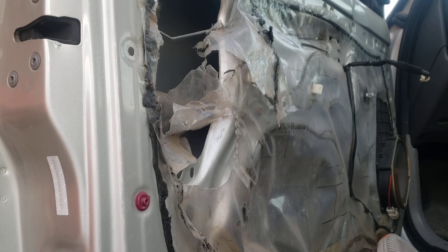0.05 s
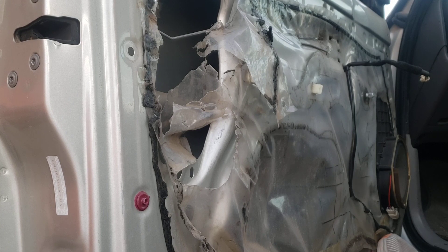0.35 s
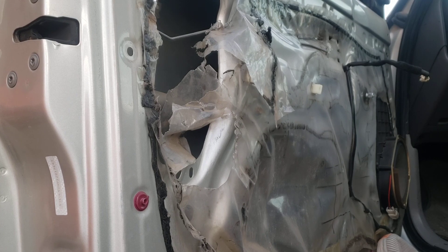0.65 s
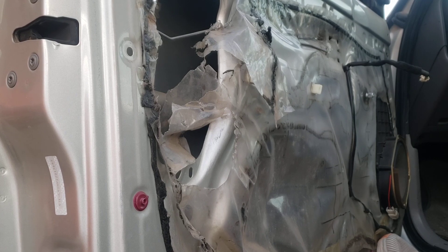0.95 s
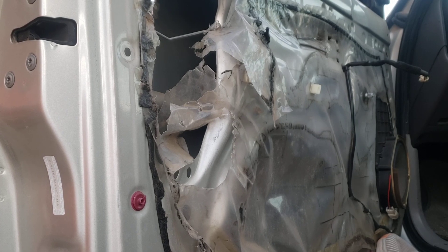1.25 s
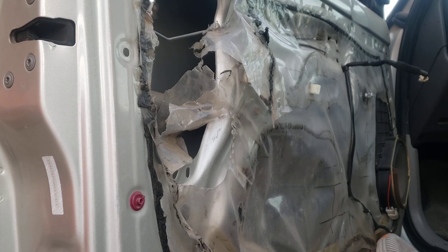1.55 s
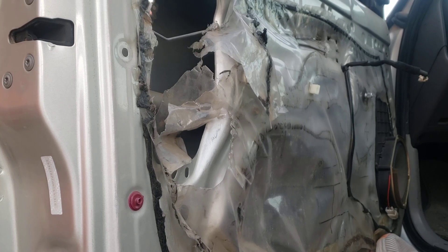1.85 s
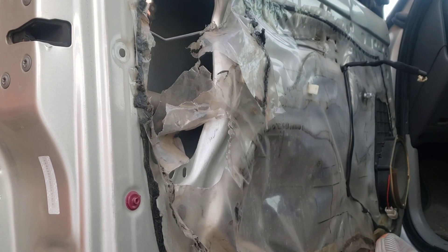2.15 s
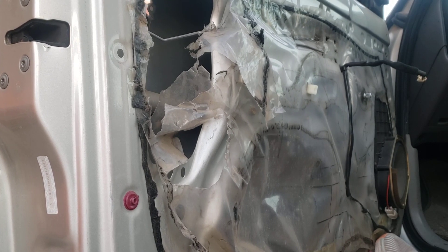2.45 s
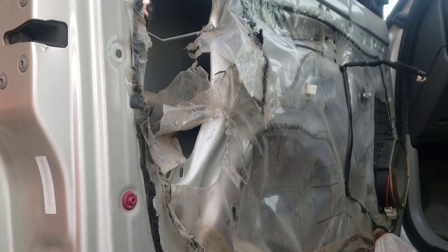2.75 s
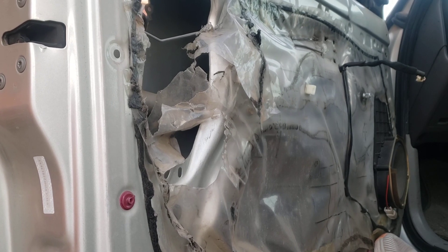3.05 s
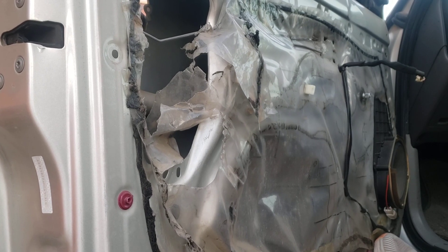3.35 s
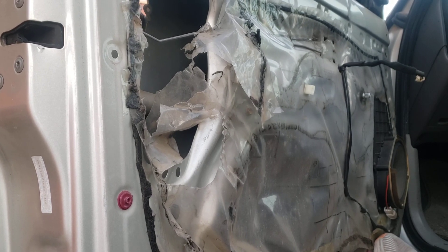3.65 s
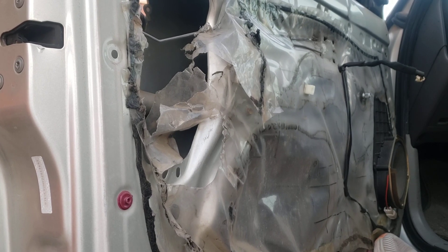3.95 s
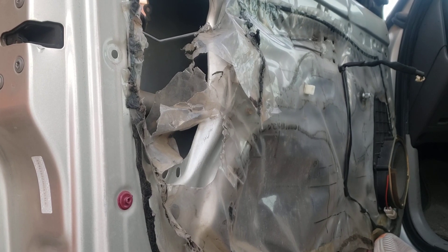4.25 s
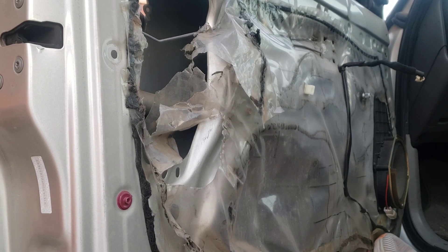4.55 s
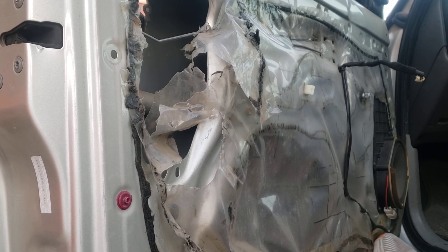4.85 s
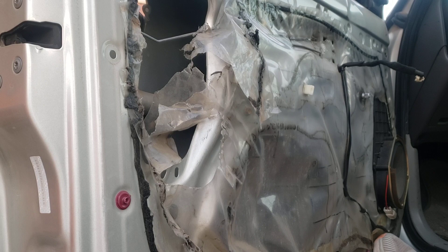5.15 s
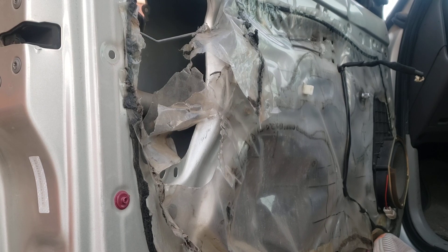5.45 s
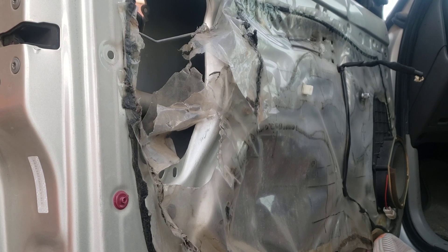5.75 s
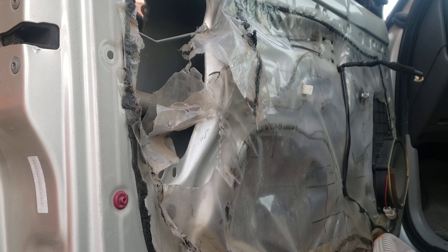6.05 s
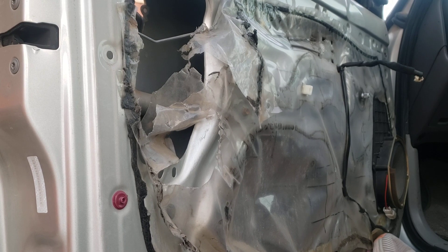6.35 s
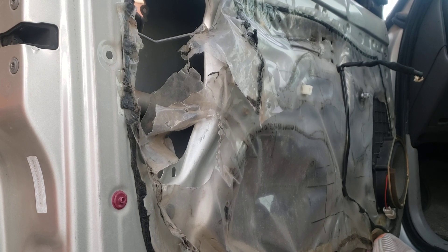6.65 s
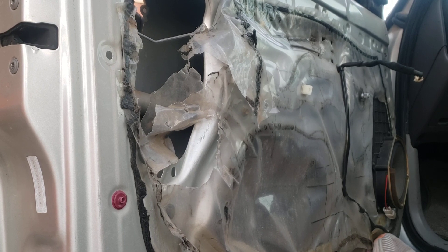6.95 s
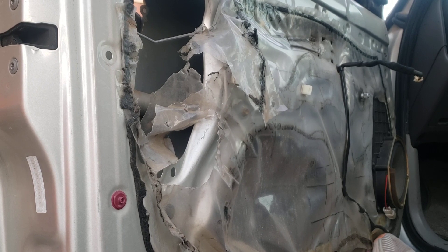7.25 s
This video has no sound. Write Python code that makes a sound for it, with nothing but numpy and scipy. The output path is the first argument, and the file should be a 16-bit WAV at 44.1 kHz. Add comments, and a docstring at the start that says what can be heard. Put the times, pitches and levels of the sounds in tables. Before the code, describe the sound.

Close to the microphone and mostly on the left, plastic sheeting in a hollow car door rustles in short, light bursts. Now and then a patch pops through with a crack and a dull knock, most strongly before the middle. In the second half the handling gets firmer, and the creases crackle and tick densely until the end. Quiet garage room tone and a low drone lie underneath.

```python
"""Plastic sheet in a car door

A stiff vapour barrier is pushed about inside a stripped car door, close to a phone in a garage.
Creases give way in showers of tiny cracks, wide folds flex and flutter, and now and then a patch snaps
through and rings the door cavity. The sheet is louder on the left microphone, as the phone's body
shades the right one. Room noise and a low rumble lie under it all."""
import sys
import numpy as np
from scipy import signal
from scipy.fft import rfft, irfft
from scipy.io import wavfile
from scipy.ndimage import uniform_filter1d

SR = 44100
rng = np.random.default_rng(int(sys.argv[2]) if len(sys.argv) > 2 else 0)


def to_wav(s):
    """Save 16-bit WAV."""
    ch = np.atleast_2d(s).T  # columns
    pcm = np.round(np.clip(ch, -1, 1) * 32767)  # PCM
    wavfile.write(sys.argv[1], SR, pcm.astype(np.int16))


N = 321489
T = np.arange(N) / SR

# spectrum of the garage's room tone: f/Hz, level/dB
ROOM_TONE = [(20, -25.5), (38, -7.5), (58, -1.5), (100, 2), (150, -5), (230, -8), (330, -17), (550, -23.5),
             (880, -20), (1400, -30), (2100, -37.5), (6000, -95), (10000, -56), (16000, -42)]
# course of the deep rumble: t/s, level/dB
RUMBLE_LEVEL = [(0, -45), (.9, -45), (2, -57.5), (3.3, -55), (7.3, -60)]
# course of the low drone: t/s, level/dB
DRONE_LEVEL = [(0, -63), (2.4, -75), (3.2, -48.5), (3.7, -48.5), (5.9, -45.5), (7.3, -54.5)]
# modes of the hollow door behind the sheet: f/Hz, t60/s, level/dB
DOOR_MODES = [(266, 0.043, -5.5), (439, 0.012, 7.5), (470.5, 0.053, 3.5), (523, 0.038, -5), (729, 0.025, 3),
              (894, 0.018, 2.5), (967, 0.03, -2), (1433, 0.014, -7.5), (1520, 0.034, -16),
              (2980, 0.092, -20.5), (3710, 0.036, -21)]
# the hand resting on the sheet, heavier towards the end: t/s, crinkle level/dB
HAND_CONTACT = [(0, -76.5), (1.85, -80), (2.05, -69), (2.7, -71.5), (2.95, -66), (3.5, -66), (4.0, -67.5),
                (5.1, -65), (5.95, -56.5), (6.5, -52), (7.3, -50)]
# pushes of the hand: t/s, swell/s, hold/s, crinkle level/dB, long creases against it/dB, fold level/dB
HAND_PUSHES = [ (0.026, 0.012, 0.0043, -52.5, -18, -40), (0.172, 0.062, .004, -52, -11.5, -44),
               (0.457, 0.03, .005, -68, 0, -45), (0.636, 0.02, 0.16, -68, -31, -70),
               (0.837, 0.0079, 0.098, -60, -32, -54), (1.056, 0.046, 0.035, -52, -9, -44.5),
               (1.126, 0.015, 0.0068, -48, -11, -45), (1.324, 0.019, 0.1, -59, -11, -50.5),
               (1.467, 0.015, 0.0083, -49, -17, -48), (1.908, 0.018, 0.0056, -53.5, -4, -40.5),
               (2.015, 0.029, 0.034, -60, 2, -51.5), (2.743, 0.053, 0.06, -54, -7, -43),
               (2.852, 0.037, 0.073, -61.5, -22, -53), (3.006, 0.083, 0.028, -50.5, -9.5, -42),
               (3.189, 0.039, 0.025, -41.5, -14.5, -46.5), (3.25, 0.12, 0.0064, -46.5, 4, -34),
               (3.618, 0.045, 0.0048, -48, -2.5, -44), (3.789, 0.0069, 0.0046, -57.5, 10, -43.5),
               (3.862, 0.018, 0.016, -55.5, -24, -52), (3.997, 0.022, 0.0086, -39, -15, -45),
               (4.18, 0.082, 0.026, -52, -19, -60), (4.312, 0.012, 0.011, -51.5, -1, -42.5),
               (4.357, 0.054, 0.17, -54, -7, -51), (4.618, 0.034, 0.011, -45.5, -5.5, -51),
               (4.71, 0.0083, 0.0041, -48.5, -11, -68), (4.778, 0.05, 0.029, -50.5, -19, -69),
               (4.865, 0.045, 0.024, -52, -12, -48), (4.968, 0.0094, 0.0088, -48.5, 5, -38.5),
               (5.071, 0.031, 0.0062, -51, -1, -44.5), (5.164, 0.062, 0.016, -49.5, 1, -43.5),
               (5.27, 0.029, 0.1, -45, 1, -37.5), (5.343, 0.11, 0.053, -41, -5, -35.5),
               (5.508, 0.022, 0.051, -52, -4, -52), (5.598, 0.014, 0.15, -39.5, -3, -39),
               (5.755, 0.052, 0.031, -46, -3, -41.5), (5.968, 0.097, 0.042, -41.5, -3, -39.5),
               (6.199, 0.034, 0.041, -39, -2.5, -36.5), (6.251, 0.044, 0.072, -30.5, -4.5, -32.5),
               (6.376, 0.013, 0.055, -50.5, 3, -43), (6.559, 0.0055, 0.14, -41.5, -2, -41.5),
               (6.744, 0.016, 0.085, -42.5, -2, -45), (6.866, 0.011, 0.046, -43.5, 1, -52),
               (6.942, 0.041, 0.031, -36, -3, -34), (7.02, 0.052, 0.073, -46, -2.5, -44),
               (7.163, 0.07, 0.12, -44.5, -2, -64), ]
# the loudest single creases: t/s, level/dB
CREASE_TICKS = [(.8176, -60), (1.0319, -22), (1.205, -43.5), (1.407, -43), (1.6916, -58), (1.7288, -55),
                (2.2449, -32.5), (2.799, -40), (3.4727, -35), (4.0045, -51), (4.235, -37), (4.5007, -37.5),
                (4.631, -41), (4.981, -36), (5.0585, -35), (5.1387, -41), (5.1728, -25), (5.2424, -35),
                (5.2805, -28.5), (5.3707, -29.5), (5.403, -22), (5.5191, -30), (5.539, -36.5),
                (5.553, -30.5), (5.6103, -36), (5.7228, -23.5), (5.758, -38), (5.7844, -30),
                (5.8267, -23.5), (5.8333, -26), (5.8697, -25.5), (5.876, -28.5), (5.9242, -35),
                (5.9618, -34), (6.013, -26), (6.0648, -21.5), (6.0967, -27.5), (6.103, -29), (6.1154, -35),
                (6.1455, -37), (6.1945, -19.5), (6.2088, -17.5), (6.2439, -19), (6.2834, -22), (6.374, -25),
                (6.4123, -26), (6.4408, -29.5), (6.4492, -32), (6.4728, -27), (6.5573, -22), (6.594, -24),
                (6.623, -27), (6.7017, -29.5), (6.723, -29.5), (6.7735, -32), (6.816, -23), (6.849, -28),
                (6.8753, -26), (6.9225, -28), (6.9956, -23.5), (7.0871, -23.5), (7.1162, -37),
                (7.1696, -22), (7.221, -27)]
# patches snapping through, some together: t/s, crack/dB, patch f/Hz, patch/dB, swing time/s, knock/dB
PATCH_SNAPS = [ (0.0414, -41, 507, -34, 0.00077, -34), (0.4587, -33, 940, -33, 0.0019, -37.5),
               (0.5765, -24, 905, -8.5, 0.0017, -19), (.5765, -52, 3500, -36, 0.0024, -54),
               (.581, -50, 2980, -43.5, 0.0065, -46), (1.0309, -32, 600, -50, 0.00088, -29),
               (1.602, -69, 850, -41, 0.0019, -55), (2.2473, -52, 4400, -54, 0.0011, -58),
               (2.586, -11, 213, -6.5, 0.0019, -15.5), (2.586, -16.5, 392, -23, 0.0048, -46),
               (2.633, -16, 958, -31, 0.0033, -34), (2.967, -62, 895, -29, 0.00062, -44),
               (3.316, -48, 870, -22.5, 0.0014, -33), (3.3393, -27, 920, -16, 0.0012, -23.5),
               (3.349, -16, 258, -22.5, 0.0023, -25.5), (3.3615, -9.5, 540, -21, 0.0022, -15.5),
               (3.3645, -43, 256, -17, 0.0035, -28), (3.3649, -38, 2150, -16.5, 0.0005, -52),
               (3.659, -42, 3500, -46, 0.0055, -40), (3.8057, -25, 471, -17.5, 0.0019, -50),
               (3.806, -26.5, 1193, -30.5, 0.0033, -36.5), (4.025, -23, 254, -25, 0.0025, -32),
               (4.32, -49, 835, -26.5, 0.00043, -49), (4.495, -43, 730, -28, 0.0012, -43),
               (6.171, -23, 890, -29.5, 0.00095, -32), (6.551, -25, 831, -31, 0.00087, -35),
               (7.1055, -24, 900, -32, 0.0018, -48), (7.1078, -34, 257, -30, 0.0038, -32.5), ]
# spectrum of a crack in the plastic: f/Hz, level/dB
CRACK_SPECTRUM = [(150, -0.5), (500, -0.5), (1400, -1.5), (2200, -0.5), (2700, -3.5), (3500, -2),
                  (5000, -6), (7000, -6), (10000, -2.5), (16000, -5.5)]
# spectrum of short, bright creases: f/Hz, level/dB
SHORT_SPECTRUM = [(1000, -28), (2900, -12), (3700, -3.5), (5400, -9.5), (7000, -11), (8800, 0.5),
                  (12500, 3), (16000, -1)]
# spectrum of long, duller creases: f/Hz, level/dB
LONG_SPECTRUM = [(200, -9), (600, 3), (1300, 7), (1750, -2.5), (2200, 5), (2800, 2), (3600, 0.5),
                 (4800, -6), (9000, -3.5), (16000, -60)]
# parts of the sheet: favoured crease f/Hz, lead at the right microphone/s
SHEET_PARTS = [(2200, 0.00019), (3700, 0.00024), (5500, 0.00016), (9000, 0.00023), (12800, 0.000137)]
# the phone's shade on the right microphone: f/Hz, level against the left/dB
PHONE_SHADE = [(60, -3.5), (200, -5), (400, -8), (750, -12), (1300, -18.5), (2400, -20), (4400, -23),
               (8000, -24.5), (15000, -10)]


def undb(db):
    """Decibels to gain."""
    return 10 ** (np.asarray(db) / 20)


def curve(rows):
    """A table of t/s and value, joined by straight lines."""
    return np.interp(T, *np.transpose(rows))


def unit(x):
    """Scale to rms 1."""
    return x / np.sqrt(np.mean(x ** 2))


def noise():
    """White noise."""
    return rng.standard_normal(N)


def colour(x, points, size=4096):
    """Causal filter following a table of f/Hz and level/dB, built from the cepstrum."""
    hz, db = np.transpose(points)
    bins_hz = np.fft.rfftfreq(size, 1 / SR)
    gain = undb(np.interp(np.log(bins_hz + 1), np.log(hz), db))
    cepstrum = irfft(np.log(gain))
    cepstrum[1:size // 2] *= 2
    cepstrum[size // 2 + 1:] = 0
    impulse = irfft(np.exp(rfft(cepstrum)))
    return signal.fftconvolve(x, impulse)[:N]


def resonate(x, hz, width_hz):
    """One resonance, gain 1 at its centre."""
    return signal.lfilter(*signal.iirpeak(hz, hz / width_hz, fs=SR), x)


def add(track, s, sound):
    """Mix a sound into a track at time s."""
    start = int(s * SR)
    track[start:start + len(sound)] += sound[:N - start]


def early(x, lead_s):
    """The same sound, reaching a microphone a little sooner."""
    return np.interp(T + lead_s, T, x)


def garage():
    """Steady room tone with a deep rumble and a low, wavering drone."""
    room = undb(-44) * unit(colour(noise(), ROOM_TONE))
    for level, hz, width_hz in ((RUMBLE_LEVEL, 44.3, 13), (DRONE_LEVEL, 76.3, 16)):
        band = resonate(noise(), hz, width_hz)
        room += undb(curve(level)) * unit(resonate(band, hz, width_hz))
    return room


def reflections(x, near_db, near_t60, far_db, far_t60):
    """Echoes off the door skin, then the garage tail; creases lie apart, so echoes never repeat."""
    out = np.zeros((2, N))
    edges_hz = np.geomspace(150, 17000, 13)
    hiss = rng.standard_normal((2, N))
    for lo, hi in zip(edges_hz, edges_hz[1:]):
        band = signal.butter(4, [lo, hi], "bandpass", fs=SR, output="sos")
        power = signal.sosfilt(band, x + 1e-9 * hiss[0]) ** 2
        energy = 0
        for db, t60 in ((near_db, near_t60), (far_db, far_t60)):
            keep = undb(-60 / (t60 * SR)) ** 2
            energy = energy + undb(db) ** 2 * signal.lfilter([1 - keep], [1, -keep], power)
        bounce = hi / np.hypot(hi, 1800)  # long waves bend round the panel instead of bouncing off it
        out += bounce * np.sqrt(energy) * unit(signal.sosfilt(band, hiss))
    return out


def metal_echo(x, echo_db, gap_s, hold_s=.07):
    """The metal just behind the sheet mirrors each crease; as the gap shifts, so does the colour."""
    hold = int(hold_s * SR) + 1
    lags = gap_s * SR * rng.uniform(.5, 2, N // hold + 1)
    lags = np.repeat(lags, hold)[:N].astype(int)
    echo = x[..., np.maximum(np.arange(N) - lags, 0)]
    return (x + undb(echo_db) * echo) / np.hypot(1, undb(echo_db))


def door(x):
    """The hollow door answers with a few short modes, neighbours in opposite phase."""
    t = T[:SR // 5]
    ring = sum((-1) ** k * undb(db - 60 * t / t60) * np.sin(2 * np.pi * hz * t)
               for k, (hz, t60, db) in enumerate(DOOR_MODES))
    return signal.fftconvolve(x, ring)[:N]


def hand(sag_db_per_s=28, release_db_per_s=344):
    """Gains of crinkle, long creases and wide folds: a push swells, sags while held and dies away."""
    resting_db = curve(HAND_CONTACT) + np.array([[0], [-1.5], [2.5]])  # crinkle, long creases, folds
    power = undb(resting_db) ** 2
    for s, swell_s, hold_s, db, long_db, fold_db in HAND_PUSHES:
        swell = np.clip((T - s) / swell_s, 0, 1)
        held_s = np.maximum(T - s - swell_s, 0)
        released_s = np.clip(held_s - hold_s, 0, 1)
        push = swell * undb(-sag_db_per_s * held_s - release_db_per_s * released_s)
        power += (undb([[db], [db + long_db], [fold_db]]) * push) ** 2
    return np.sqrt(power)


def shower(per_s, spread_db, decay_s, even_s):
    """Envelope of random buckles, many small and a few larger, each dying quickly; rms near 1."""
    size = undb(spread_db * np.minimum(rng.exponential(size=N), 4))
    energy = (rng.random(N) < per_s / SR) * size ** 2
    energy = signal.lfilter([1], [1, -np.exp(-2 / (decay_s * SR))], energy) + 1e-4
    # the hand feeds energy in steadily, so a large buckle relieves its neighbours
    supply = uniform_filter1d(energy, int(even_s * SR) + 1)
    return np.sqrt(energy / supply)


def crack(swell_s, size=1024):
    """A buckle runs along a crease, swells and dies away."""
    age = T[:size] / swell_s
    return rng.choice([-1, 1], size) * age * np.exp(1 - age)


def wide_folds(fold_gain):
    """Wide folds flop over and sound through the door."""
    flops = shower(per_s=260, spread_db=0.5, decay_s=0.00071, even_s=0.0313) * noise()
    tone = [(120, 8.5), (390, -7.5), (475, -3.5), (570, -4.5), (850, -0.5), (1600, 3.5), (4000, -18)]
    return undb(-4) * fold_gain * unit(colour(door(flops), tone))


def ticks():
    """Single stiff creases let go with a bright click, each ringing briefly at its own pitch."""
    track = np.zeros(N)
    pitches_hz = np.exp(rng.uniform(np.log(3800), np.log(14000), len(CREASE_TICKS)))
    for (s, db), hz in zip(CREASE_TICKS, pitches_hz):
        click = crack(swell_s=0.00046)
        ring = undb(7) * resonate(click, hz, .14 * hz)
        add(track, s, undb(db) * (click + ring))
    return colour(track, CRACK_SPECTRUM)


def snaps():
    """A patch cracks, swings a few times at its own pitch and knocks on the door."""
    cracks, swings, knocks = np.zeros((3, N))
    t = T[:SR // 20]
    for s, crack_db, hz, patch_db, swing_s, knock_db in PATCH_SNAPS:
        add(cracks, s, undb(crack_db) * crack(swell_s=0.00065))
        swell = t / swing_s * np.exp(1 - t / swing_s)
        add(swings, s, -undb(patch_db) * swell * np.sin(2 * np.pi * hz * t))
        add(knocks, s, undb([knock_db]))
    # the swings carry no deep bass below about 75 Hz
    swings = signal.sosfilt(signal.butter(2, 75, "highpass", fs=SR, output="sos"), swings)
    return undb(-2) * (colour(cracks, CRACK_SPECTRUM) + swings + door(knocks))


def crinkle(fine_gain, long_gain):
    """The sheet close up, on both microphones: gentle pushes slide, hard ones buckle the creases."""
    sliding_share = 1 / (1 + fine_gain / undb(-59.5))
    # one buckle sets off its neighbours, so they come in short, sharp volleys
    volleys = shower(per_s=210, spread_db=1.0, decay_s=0.0024, even_s=0.018)
    short = unit(colour(noise(), SHORT_SPECTRUM))
    long = unit(colour(noise(), LONG_SPECTRUM))
    coarseness = long_gain / fine_gain
    out = np.zeros((2, N))
    for hz, lead_s in SHEET_PARTS:
        shift = rng.integers(N)  # the parts rustle independently
        film = undb(-3.5) * np.roll(short, shift) + coarseness * np.roll(long, shift)
        film = undb(-3) * film + undb(6) * resonate(film, hz, 0.26 * hz)
        buckles = shower(per_s=900, spread_db=-0.5, decay_s=0.00021, even_s=0.024) * volleys
        texture = np.sqrt(sliding_share + (1 - sliding_share) * buckles ** 2)
        part = undb(-6.5) * fine_gain * film * texture
        out += [part, early(part, lead_s)]
    return metal_echo(out, echo_db=-4.5, gap_s=.0008)


def scene():
    """Two microphones close to the door, each with its own echoes; the right one is early and shaded."""
    fine_gain, long_gain, fold_gain = hand()
    creases = crinkle(fine_gain, long_gain)
    flexing = wide_folds(fold_gain) + snaps() + ticks()
    echoes = reflections(creases[0] + flexing, near_db=-3, near_t60=0.07, far_db=-14.5, far_t60=0.16)
    common = flexing + garage()
    left = creases[0] + common + echoes[0]
    right = creases[1] + early(common, lead_s=9 / SR) + undb(8.5) * echoes[1]
    return np.array([left, colour(right, PHONE_SHADE)])


def record(dry):
    """The phone cuts the top steeply above 16 kHz."""
    return signal.sosfilt(signal.ellip(10, .2, 80, 16000, fs=SR, output="sos"), dry)


dry = scene()
out = record(dry)
to_wav(out)
```